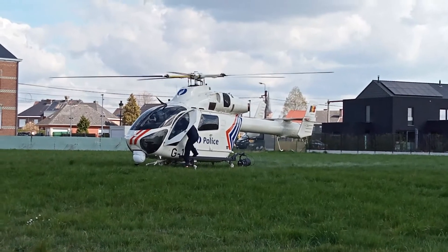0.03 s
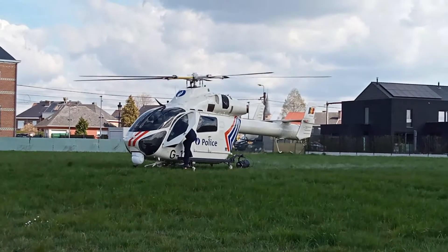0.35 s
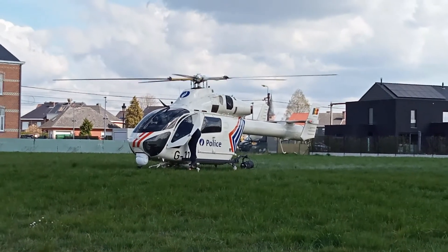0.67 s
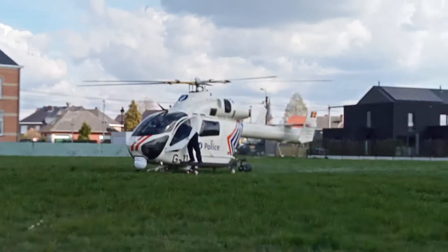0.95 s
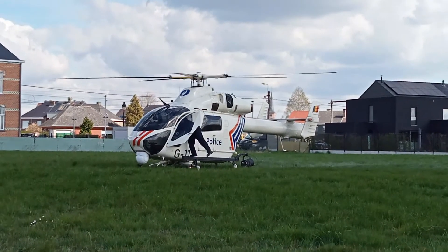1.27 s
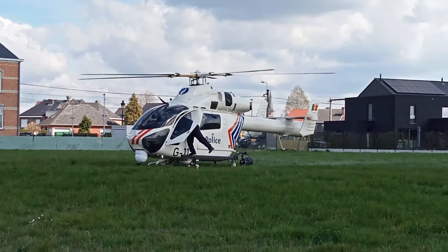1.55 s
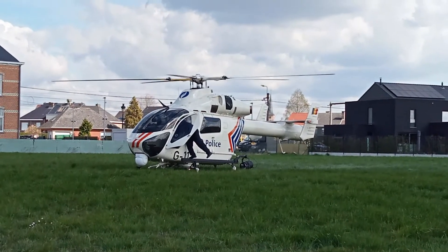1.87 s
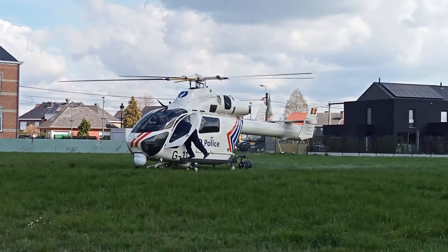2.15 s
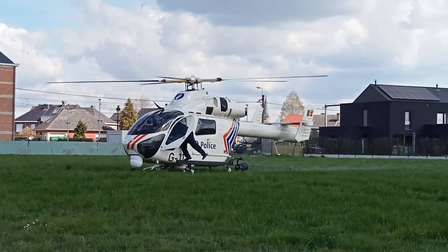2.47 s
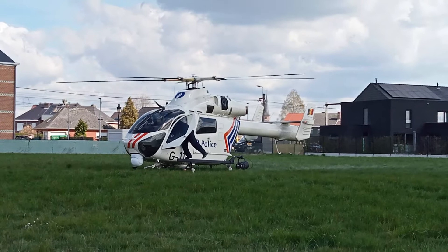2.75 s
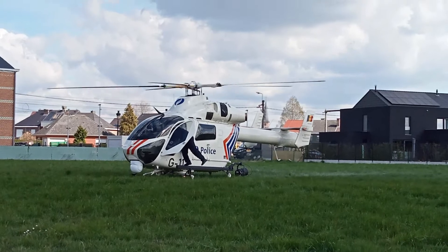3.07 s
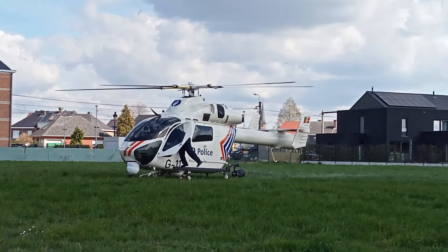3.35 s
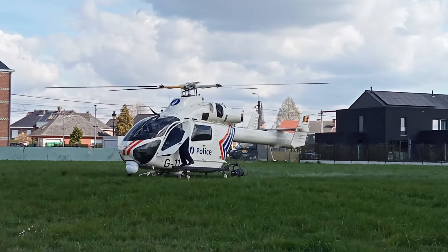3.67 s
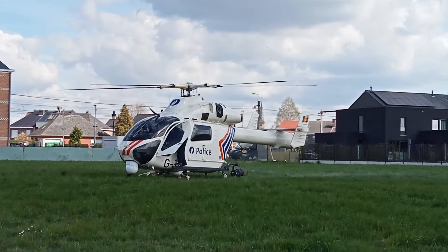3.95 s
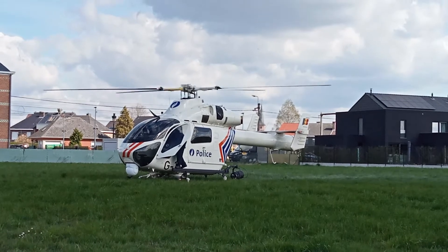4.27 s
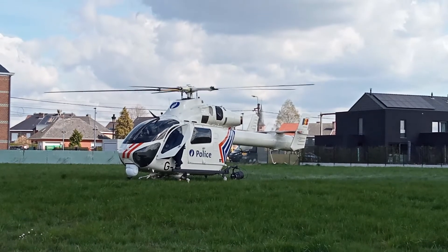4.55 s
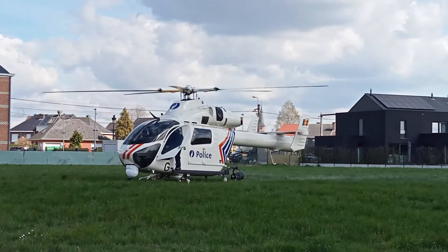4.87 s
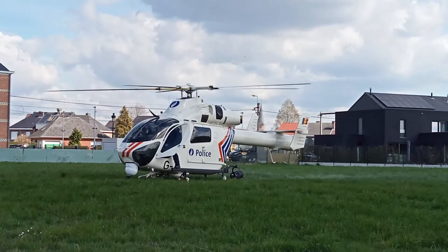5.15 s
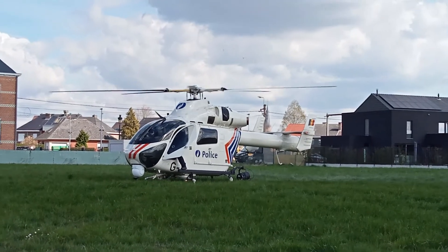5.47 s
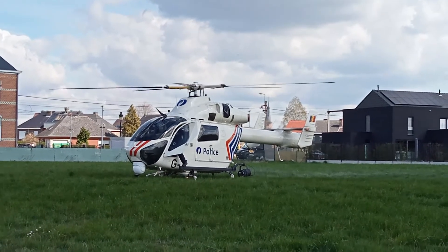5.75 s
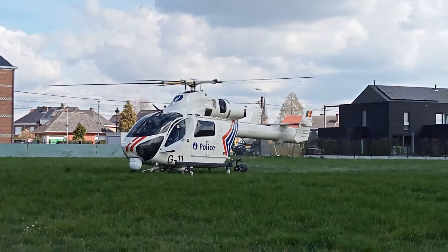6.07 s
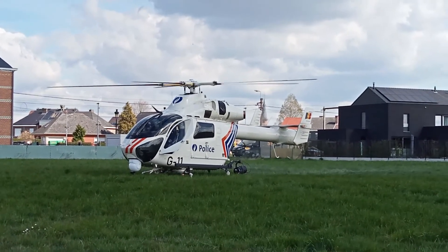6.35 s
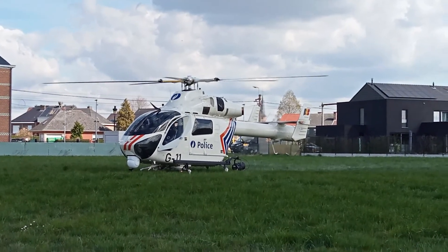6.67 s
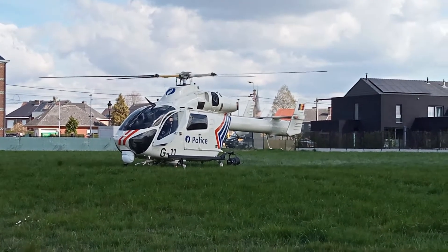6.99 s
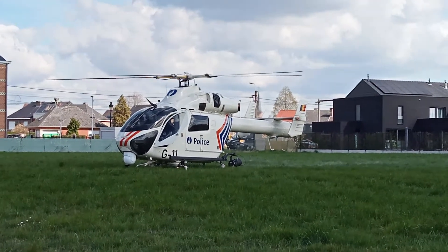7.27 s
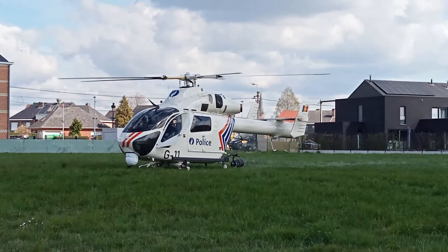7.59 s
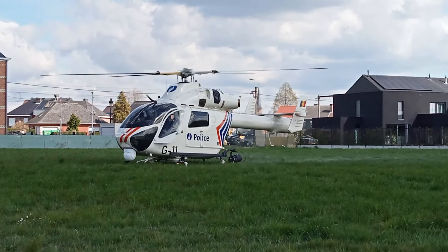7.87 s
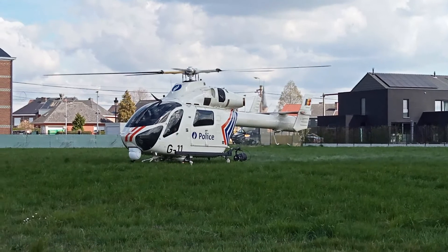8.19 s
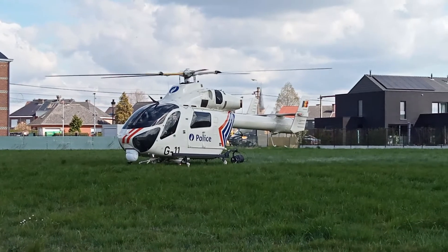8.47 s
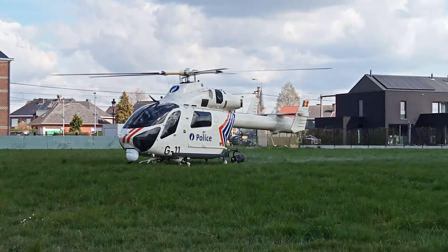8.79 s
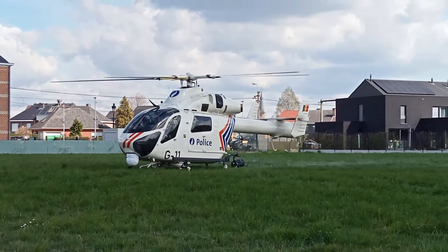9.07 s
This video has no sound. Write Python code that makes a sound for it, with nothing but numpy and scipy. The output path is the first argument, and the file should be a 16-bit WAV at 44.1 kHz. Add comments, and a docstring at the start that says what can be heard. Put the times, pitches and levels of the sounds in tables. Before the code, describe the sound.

A helicopter's turbine hisses and roars on the ground over a low rotor rumble, winding up into a thin rising whine halfway through.

```python
"""A turbine helicopter idles on a grass field, some way from one microphone in a light breeze.
Its burner roars, bleed air hisses and whistles through a valve, the intake sizzles and gear teeth sing.
After five seconds the fuel rises: the exhaust flares, the compressor blades whine upward, the valve
closes, and the gearbox slowly follows. Air stirred by the rotor rumbles, puffs buffet the microphone,
and moving air makes the treble swell and flicker."""
import sys
import numpy as np
from scipy import signal
from scipy.fft import rfft, irfft, next_fast_len
from scipy.io import wavfile
from scipy.ndimage import uniform_filter1d, map_coordinates

SR = 44100
rng = np.random.default_rng(int(sys.argv[2]) if len(sys.argv) > 2 else 0)


def unload_wav(signal):
    """Save mono or channel-first audio to the path in sys.argv[1] as 16-bit WAV at rate SR, clipped to [-1, 1]."""
    wavfile.write(
        sys.argv[1],
        SR,
        np.round(np.clip(np.atleast_2d(signal).T, -1, 1) * 32767).astype(np.int16),
    )


N = 402633


def amp(db):
    """Decibels to gain."""
    return 10 ** (np.asarray(db) / 20)


def unit(x):
    """x at rms 1."""
    return x / np.sqrt(np.mean(np.abs(x) ** 2) + 1e-20)


def curve(rows):
    """(t/s, value) rows to one value per sample."""
    times_s, values = np.transpose(rows)
    return np.interp(np.arange(N) / SR, times_s, values)


def wobble(rate_hz):
    """Smooth random curve, rate_hz knots a second."""
    knots = rng.standard_normal(int(N * rate_hz / SR) + 4)
    return map_coordinates(knots, [np.arange(N) * rate_hz / SR])


def filtered(x, response):
    """x through a frequency response."""
    size = next_fast_len(N + 8192)
    gain = response(np.fft.rfftfreq(size, 1 / SR))
    return irfft(rfft(x, size) * gain, size)[..., :N]


def colour(points):
    """Response through (f/Hz, level/dB) points on a log axis."""
    f, db = np.transpose(points)
    return lambda hz: amp(np.interp(np.log(hz + 1), np.log(f + 1), db, left=-120, right=-120))


def resonances(modes):
    """Response of steep-sided (f/Hz, width/Hz, level/dB) peaks, added in power."""
    def response(hz):
        peaks = (amp(db) / (1 + ((hz - f) / width) ** 2) ** 1.29 for f, width, db in modes)
        return np.sqrt(sum(peak ** 2 for peak in peaks))
    return response


def rush(response, patchy_db):
    """Turbulent noise of rms 1, with drifting patches of gain."""
    spectrum = signal.stft(rng.standard_normal(N), nperseg=512)[2]
    patches = uniform_filter1d(rng.standard_normal(spectrum.shape), size=7, axis=0)
    patches = uniform_filter1d(patches, size=16, axis=1)
    noise = signal.istft(spectrum * amp(patchy_db * unit(patches)), nperseg=512)[1][:N]
    return unit(filtered(noise, response))


def tone(pitch_hz, scatter, width_hz):
    """Tone of rms 1 heard through eddies: a direct part plus a randomly fading scattered part."""
    noise = rng.standard_normal((2, N))
    eddies = filtered(noise, lambda hz: (1 + (hz / width_hz) ** 2) ** -0.6 / (1 + (hz / 500) ** 2))
    fading = np.sqrt(1 - scatter) + np.sqrt(scatter) * unit(eddies[0] + 1j * eddies[1])
    phase = 2 * np.pi * np.cumsum(pitch_hz) / SR
    return unit(np.real(fading * np.exp(1j * phase)))


# treble carried by the breeze: t/s, level/dB
TREBLE_LEVEL = [(0.0, -28.5), (0.25, -27), (0.41, -19), (0.46, -22.5), (0.58, -19.5), (0.76, -25),
                (0.94, -19.5), (1.07, -27.5), (1.45, -24), (1.52, -17.5), (1.88, -24), (2.41, -22.5),
                (2.49, -17.5), (3.23, -27), (3.38, -20), (3.71, -22.5), (3.84, -20), (4.35, -26.5),
                (4.45, -23), (4.6, -28), (4.81, -22), (5.08, -25), (5.21, -22.5), (5.49, -26.5),
                (5.72, -21.5), (6.26, -19.5), (6.46, -28.5), (6.74, -25), (7.68, -22.5), (7.8, -29),
                (8.16, -24.5), (8.47, -32.5), (8.9, -22), (9.13, -32.5)]


def swell_db():
    """The breeze lifts and drops the treble about its mean."""
    treble_db = curve(TREBLE_LEVEL)
    return treble_db - treble_db.mean()


# compressor blade tone: t/s, f/Hz
BLADE_PITCH = [(4.92, 9245), (5.2, 9525), (5.75, 10348), (6.05, 10774), (6.4, 11135), (6.65, 11235),
               (7.25, 11245), (7.95, 11368), (9.13, 11460)]


def power():
    """0 at idle, 1 once the compressor is up to speed."""
    return np.interp(curve(BLADE_PITCH), [9600, 11100], [0, 1])


def flow_db(idle_db, swell_share, power_db):
    """Level of a gas noise: swells with the breeze, settles under power."""
    return idle_db + swell_share * swell_db() + power_db * power()


# burner: t/s, level/dB
BURNER_LEVEL = [(0, -33.5), (3.75, -33), (4.0, -36), (4.75, -34.5), (5.7, -33), (7.2, -30.5), (8.1, -32),
                (8.9, -29.5), (9.13, -31)]
# burner, jet and casing noise spectra: f/Hz, level/dB
ROAR_SPECTRUM = [(250, -34), (430, -11.5), (486, -25), (605, -2), (684, -4), (787, -2.5), (985, -7),
                 (1040, -11), (1170, -13), (1270, -8.5), (1640, -12), (1750, -8), (2280, -8), (3850, -120)]
JET_SPECTRUM = [(940, -37), (1600, -14.5), (1920, -0.5), (2080, -9.5), (2210, -1), (2450, 0), (2630, 6),
                (2700, 1), (2770, 6), (2890, 1.5), (3140, -9), (3300, -9), (4290, -16), (7260, -120)]
CASING_SPECTRUM = [(1820, -58), (3040, 3), (3210, -37), (3470, 2.5), (3650, 9), (4180, -20), (4680, 4),
                   (5180, -35), (5680, 3), (5940, 1), (6200, -22), (8060, -33), (13600, -120)]
# tailpipe resonance: f/Hz, width/Hz, level/dB
TAILPIPE_MODES = [(550, 77, 0)]
FLARE_START_S, FLARE_ATTACK_S, FLARE_HOLD_S, FLARE_RELEASE_S = 4.9, 0.23, 0.26, 0.18
FLARE_ROAR_DB, FLARE_JET_DB = 7, 5.5


def exhaust():
    """Burner roar and jet rush flare as the fuel rises; the casing leaks noise, the tailpipe booms."""
    flare_s = np.cumsum([FLARE_START_S, FLARE_ATTACK_S, FLARE_HOLD_S, FLARE_RELEASE_S])
    flare = np.interp(np.arange(N) / SR, flare_s, [0, 1, 1, 0])
    roar_db = curve(BURNER_LEVEL) + FLARE_ROAR_DB * flare + 0.17 * wobble(13)
    roar = amp(roar_db) * rush(colour(ROAR_SPECTRUM), patchy_db=1.54)
    jet_db = flow_db(-30, swell_share=0.3, power_db=-3.1) + FLARE_JET_DB * flare + 0.35 * wobble(14)
    jet = amp(jet_db) * rush(colour(JET_SPECTRUM), patchy_db=1.6)
    casing_db = flow_db(-34, swell_share=0.27, power_db=-2.3)
    casing = amp(casing_db) * rush(colour(CASING_SPECTRUM), patchy_db=2.0)
    boom_db = np.interp(curve(BLADE_PITCH), [9500, 11200], [-62, -44])  # grows with gas flow
    boom = amp(boom_db) * rush(resonances(TAILPIPE_MODES), patchy_db=1.5)
    return roar + jet + casing + boom


# bleed hiss, falling as the valve closes: t/s, level/dB
BLEED_LEVEL = [(0.0, -27), (0.53, -16.5), (0.64, -22), (0.91, -17.5), (1.09, -24.5), (1.5, -20),
               (3.63, -21.5), (3.81, -17.5), (4.63, -24.5), (4.65, -21), (5.29, -19.5), (5.39, -21),
               (5.85, -17), (6.48, -31.5), (7.58, -30), (8.67, -33.5), (8.72, -30), (9.13, -33)]


def bleed_db(mean_db, bleed_share, swell_share):
    """Level of a resonator blown by bleed air."""
    hiss_db = curve(BLEED_LEVEL)
    return mean_db + bleed_share * (hiss_db - hiss_db.mean()) + swell_share * swell_db()


# duct, valve throat and outlet resonances: f/Hz, width/Hz, level/dB
DUCT_MODES = [(5558, 76, 0.5), (5755, 150, -3), (5720, 710, -7)]
THROAT_MODES = [(4507, 254, -7), (4824, 195, -0.5), (5020, 100, -9.5)]
OUTLET_MODES = [(3497, 225, -8.5), (3696, 170, -8.5), (4045, 130, -6)]
HOT_DUCT_RATIO = 1.009


def bleed_hiss(flicker_db):
    """Bleed air rings duct, throat and outlet; hotter air under power raises the duct's resonances."""
    cool = rush(resonances(DUCT_MODES), patchy_db=0.5)
    hot = rush(lambda hz: resonances(DUCT_MODES)(hz / HOT_DUCT_RATIO), patchy_db=0.5)
    duct_db = bleed_db(-25.5, bleed_share=0.79, swell_share=0.29) + flicker_db + 1.02 * wobble(20)
    duct = amp(duct_db) * (np.sqrt(1 - power()) * cool + np.sqrt(power()) * hot)
    throat_db = bleed_db(-30, bleed_share=1.07, swell_share=0.03) + flicker_db + 0.69 * wobble(16)
    throat = amp(throat_db) * rush(resonances(THROAT_MODES), patchy_db=2.2)
    outlet_db = flow_db(-29.5, swell_share=0.5, power_db=-11.5) + flicker_db
    outlet = amp(outlet_db) * rush(resonances(OUTLET_MODES), patchy_db=1.5)
    return duct + throat + outlet


# valve lip whistles: f/Hz, level/dB
LIP_TONES = [(4825, -36), (5580, -33)]
WHISTLE_FITS_DB = 4


def valve_whistles():
    """The lip of the open valve whistles in fits, dying away under power."""
    lip = np.zeros(N)
    for hz, db in LIP_TONES:
        fits = amp(WHISTLE_FITS_DB * wobble(11))
        lip += amp(db) * unit(fits * tone(np.full(N, hz), scatter=0.96, width_hz=60))
    drive = amp(bleed_db(0, bleed_share=0.57, swell_share=0))
    return drive * np.sqrt(1 - power()) * lip


# peaks of the high intake sizzle, rippled by ground reflection: f/Hz, width/Hz, level/dB
SIZZLE_PEAKS = [(5730, 450, -3.5), (6550, 260, -1.5), (7026, 260, -1), (7400, 290, -3), (7790, 390, -3),
                (8330, 300, -2), (9030, 280, 2), (9510, 240, -1.5), (10150, 440, -2.5), (10740, 350, -1.5),
                (11420, 330, -10.5), (12200, 330, -16), (13040, 300, -16), (13350, 350, -14),
                (14270, 370, -18.5), (15050, 450, -23)]


def intake(flicker_db):
    """Intake air sizzles in the high treble."""
    sizzle_db = flow_db(-22.5, swell_share=0.97, power_db=-0.2) + 1.9 * flicker_db
    return amp(sizzle_db) * rush(resonances(SIZZLE_PEAKS), patchy_db=1.6)


# blade whine: t/s, level/dB
WHINE_LEVEL = [(4.9, -38), (5.2, -31), (5.4, -51), (6.05, -23.5), (6.3, -21), (6.43, -31), (6.6, -21),
               (7.35, -30), (7.65, -21.5), (8.15, -24.5), (8.6, -26.5), (8.88, -17.5), (9.13, -24)]
BLADE_COUNT = 15


def compressor():
    """The blades whine; their shaft hums at its turning rate, louder at speed and with the burner."""
    blade_hz = curve(BLADE_PITCH)
    at_speed = np.interp(blade_hz, [10300, 10700], [0, 1])
    whine_db = curve(WHINE_LEVEL) + (1 - at_speed) * 0.72 * swell_db() + 1.6 * wobble(9)
    whine = amp(whine_db) * tone(blade_hz, scatter=0.48, width_hz=20)
    hum_db = curve(BURNER_LEVEL) - 16 * (1 - at_speed)
    hum = amp(hum_db) * tone(blade_hz / BLADE_COUNT, scatter=0.055, width_hz=13)
    return whine + hum


# gear mesh: t/s, f/Hz
MESH_PITCH = [(0, 1507), (5.2, 1500), (6.1, 1600), (6.5, 1656), (8.4, 1881), (9.13, 1956)]
# gear tones: ratio to mesh pitch, level/dB
GEAR_TONES = [(1, -50.5), (.5, -46), (.603, -55), (.654, -55), (.981, -60)]
# gearbox housing resonances: f/Hz, width/Hz, level/dB
HOUSING_MODES = [(838, 35, 3), (964, 5.9, 4), (1165, 12, 8), (1660, 21, 16.5), (1773, 18, 19),
                 (1878, 29, 18.5), (1940, 20, 10)]


def gearbox():
    """Gear tones climb slowly as the heavy rotor speeds up, swelling at the housing's resonances."""
    mesh_hz = curve(MESH_PITCH)
    tones = []
    for ratio, db in GEAR_TONES:
        gear_hz = ratio * mesh_hz
        housing_gain = 1 + resonances(HOUSING_MODES)(gear_hz)
        tones.append(amp(db) * housing_gain * tone(gear_hz, scatter=0.27, width_hz=9))
    mesh, *stages = tones
    load_db = np.interp(mesh_hz, [1520, 1660], [-14, 0])  # driven teeth sing louder
    return mesh + amp(load_db + 2.7 * wobble(5)) * sum(stages)


# rotor wash: t/s, level/dB
WASH_LEVEL = [(0, -39), (1.0, -35), (1.3, -36.5), (1.65, -35), (2.2, -36.5), (3.7, -37.5), (4.25, -40.5),
              (5.3, -36.5), (6.3, -37), (7.6, -33.5), (8.1, -36), (8.9, -32)]
# wash spectrum: f/Hz, level/dB
WASH_SPECTRUM = [(15, -53), (25, -32), (74, -4), (97, -1), (237, 0), (301, -3), (355, -8.5), (458, -17),
                 (520, -10), (680, -23), (1140, -120)]


def rotor_wash():
    """Air stirred by the rotor rumbles."""
    rumble_db = curve(WASH_LEVEL) + 1.0 + 1.35 * wobble(14)
    return amp(rumble_db) * rush(colour(WASH_SPECTRUM), patchy_db=1.7)


# wind puffs: centre t/s, level/dB, half length/s
PUFF_EVENTS = [(2.153, -30, 0.017), (2.485, -24.5, .026), (2.568, -27, .026), (2.72, -28, 0.036),
               (3.117, -31, 0.024), (4.618, -29, 0.037), (5.127, -24.5, 0.014), (5.186, -22, 0.016),
               (6.975, -31.5, 0.033), (7.1, -29, 0.043), (7.207, -28.5, .016), (7.374, -26.5, 0.021),
               (7.523, -25, 0.02), (7.622, -23, .015), (7.656, -18, 0.0091), (7.78, -23, 0.017),
               (7.887, -27, .014), (8.678, -31, 0.019)]
# puff spectrum: f/Hz, level/dB
PUFF_SPECTRUM = [(25, -30), (55, -7), (100, 5.5), (170, -1), (300, -8.5), (500, -22.5), (1200, -33)]


def wind_puffs():
    """Single puffs buffet the microphone, each a bell-shaped burst of low noise."""
    t = np.arange(N) / SR
    eddies = rush(colour(PUFF_SPECTRUM), patchy_db=4.5)
    puffs = np.zeros(N)
    for centre_s, db, half_s in PUFF_EVENTS:
        near = np.abs(t - centre_s) < 4 * half_s
        envelope = np.exp(-0.5 * ((t[near] - centre_s) / half_s) ** 2)
        puff = envelope * eddies[near]
        puffs[near] += amp(db) * puff * np.linalg.norm(envelope) / np.linalg.norm(puff)
    return puffs


def scene():
    """All sources at one microphone, alike in both channels."""
    engine = compressor() + gearbox() + exhaust()
    flicker_db = 0.58 * wobble(16) + 0.3 * wobble(45)  # the breeze shakes bleed and intake together
    airflow = bleed_hiss(flicker_db) + intake(flicker_db) + valve_whistles()
    mono = engine + airflow + rotor_wash() + wind_puffs()
    return np.array([mono, mono])


BAND_LIMIT_HZ = 15500


def record(dry):
    """Brick-wall low-pass."""
    return filtered(dry, lambda hz: hz < BAND_LIMIT_HZ)


dry = scene()
out = record(dry)
unload_wav(out)
```